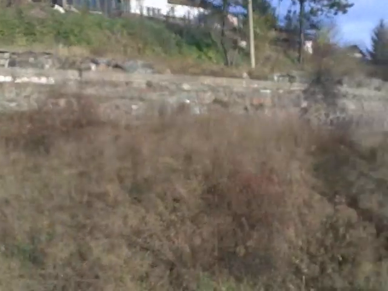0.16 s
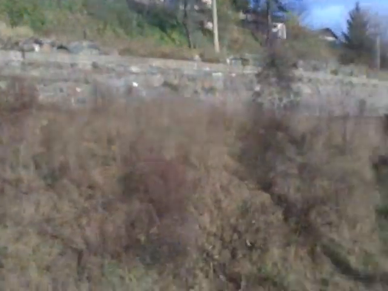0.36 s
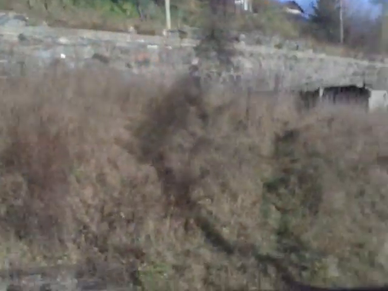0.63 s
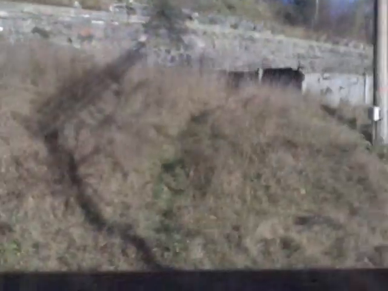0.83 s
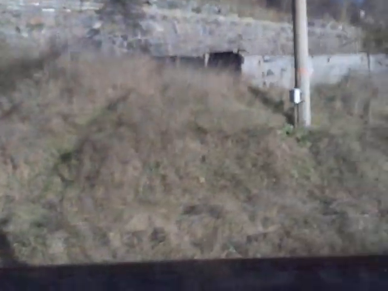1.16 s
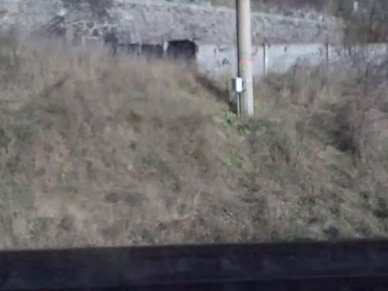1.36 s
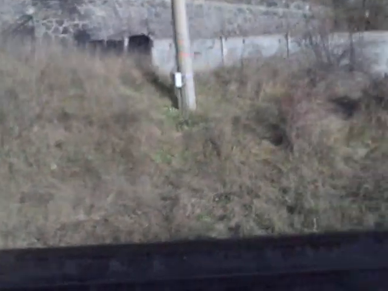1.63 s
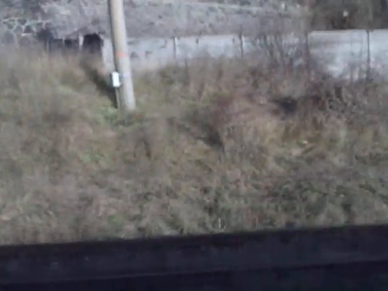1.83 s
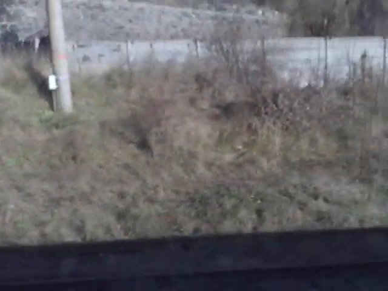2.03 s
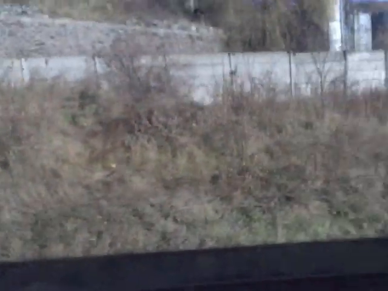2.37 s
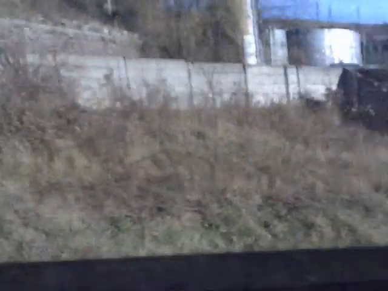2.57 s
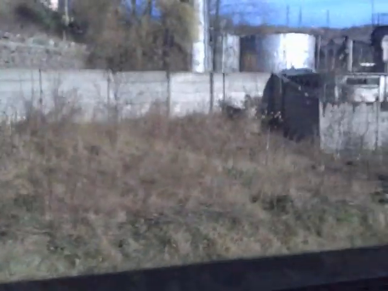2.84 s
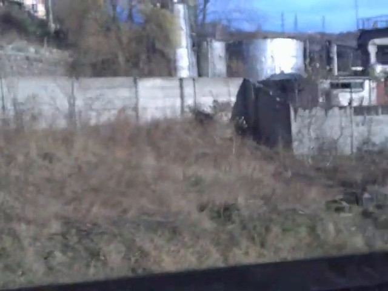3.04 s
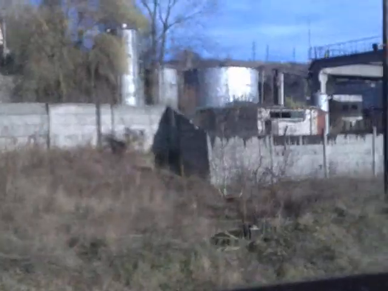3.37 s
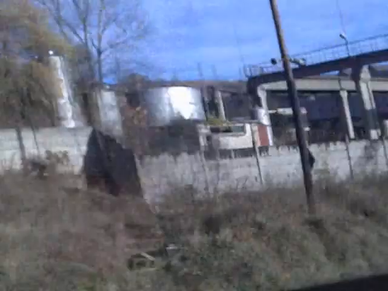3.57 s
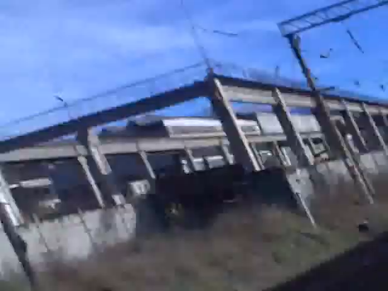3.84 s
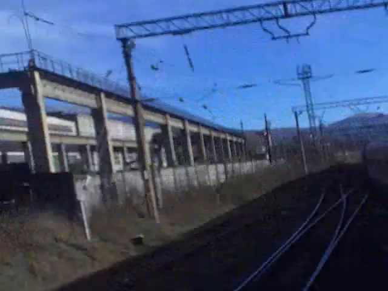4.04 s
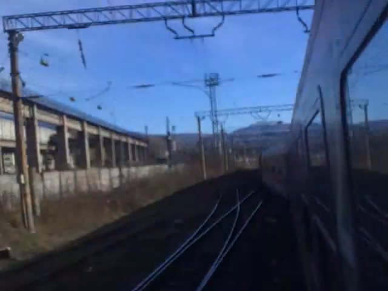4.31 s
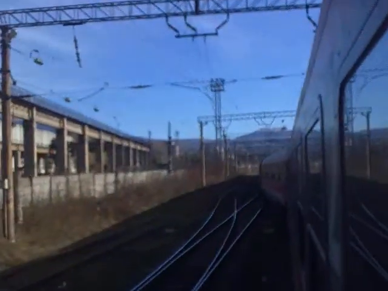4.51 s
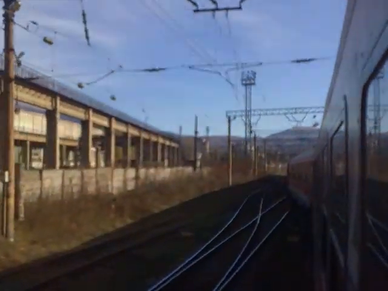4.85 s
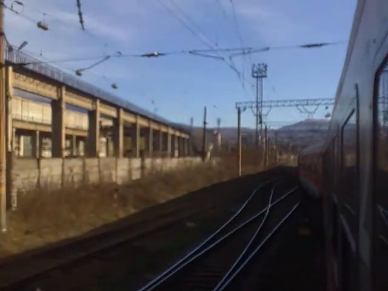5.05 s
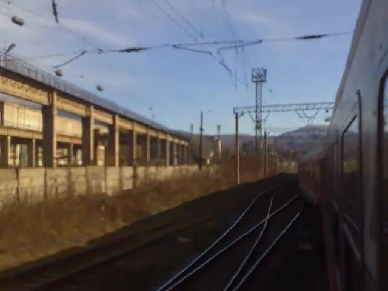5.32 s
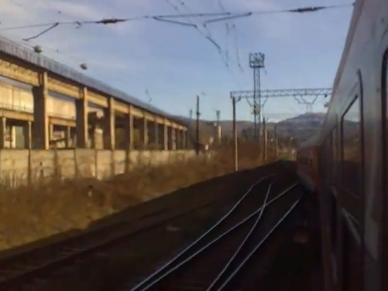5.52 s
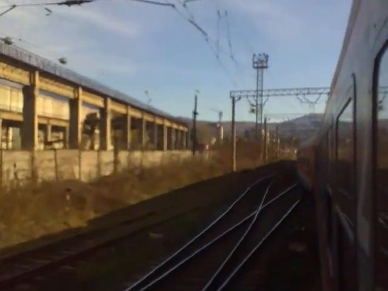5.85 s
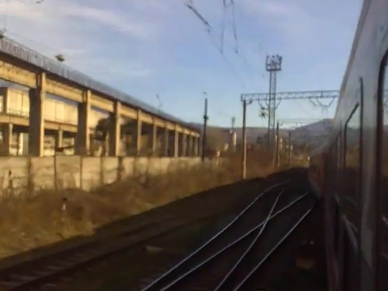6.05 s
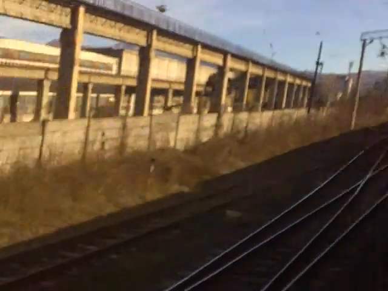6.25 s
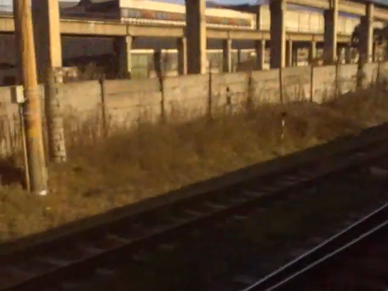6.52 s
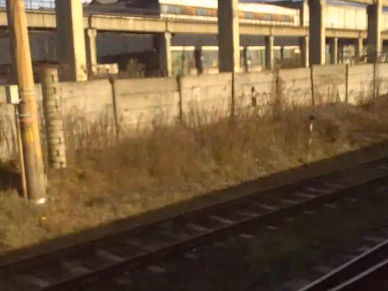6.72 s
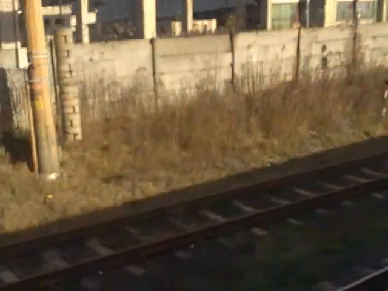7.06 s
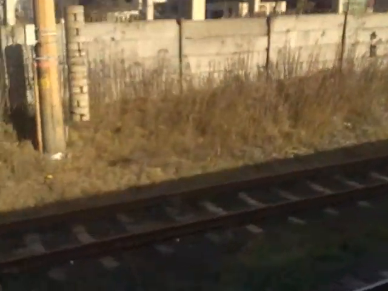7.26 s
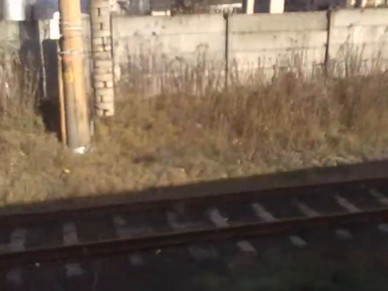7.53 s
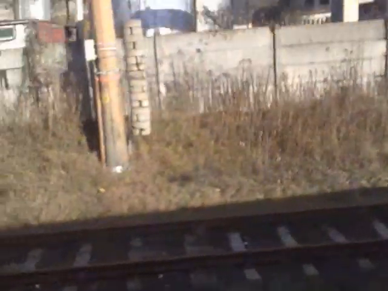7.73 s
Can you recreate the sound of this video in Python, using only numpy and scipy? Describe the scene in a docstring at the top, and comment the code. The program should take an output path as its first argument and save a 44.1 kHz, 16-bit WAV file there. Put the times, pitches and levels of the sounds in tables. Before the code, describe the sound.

A passenger train clanks over rail joints and switches, with dull bumps on the hand-held microphone and brief flange squeals, through a narrow, overloading microphone.

```python
"""A passenger train rolls through station switches, heard at an open window beside a concrete wall.
After a faint start, wheels clang over joints and frogs, each blow a noise burst with echoes and resonances.
In the first half dull, dry bumps, runs of short decaying swings, jostle the hand-held microphone.
Flanges sing briefly as sines; after the middle, blows ring longer and flanges grind in uneven noise.
Rumble and rail rush, shaped noise, run throughout; the narrow-band microphone overloads on big blows."""
import sys
import numpy as np
from scipy import signal
from scipy.fft import rfft, irfft, next_fast_len
from scipy.io import wavfile
from scipy.ndimage import uniform_filter1d, map_coordinates

SR = 44100
rng = np.random.default_rng(int(sys.argv[2]) if len(sys.argv) > 2 else 0)


def to_wav(sig):
    """Store sig (one row per channel, or 1-D mono) as 16-bit WAV at the path in sys.argv[1].

    Samples outside -1..1 are clipped; the rate is SR.
    """
    pcm = np.clip(np.atleast_2d(sig), -1, 1) * 32767
    pcm = np.round(pcm).astype(np.int16)
    wavfile.write(sys.argv[1], SR, pcm.T)  # frames by channels


N = 347949
TIME = np.arange(N) / SR

# resonances of wheel and rail: pitch_hz, width_hz, level_db (resonant() adds 6 dB)
STEEL_MODES = [(910, 36, -7.5), (1074, 33, -10), (1260, 32, -14), (1662, 43, -3.5), (1950, 42, -13.5),
               (2320, 61, -3), (3270, 88, -9)]
# rolling on plain track, then through the switches; rumble follows the shaking of the coach,
# rush the roughness of the rail: time_s, rumble_db, rush_db (both before trim)
ROLLING_LEVELS = [(0.0, -53.5, -54), (0.86, -49.5, -55), (1.54, -26.5, -34), (1.78, -29.5, -44),
                  (2.11, -27, -41), (2.46, -33.5, -34.5), (2.79, -25.5, -35.5), (3.05, -35.5, -41.5),
                  (3.56, -28.5, -35), (3.78, -32, -33.5), (4.04, -43.5, -42.5), (4.64, -40.5, -42.5),
                  (4.83, -38, -34), (5.23, -37, -33.5), (5.62, -44, -41.5), (5.87, -47, -45.5),
                  (6.08, -35, -26.5), (6.2, -38, -22.5), (6.81, -36, -32), (7.01, -30, -27),
                  (7.14, -35.5, -30), (7.89, -42, -37)]


def clangs():
    """Impact excitation: each blow sets off a dense steel clatter and a shorter boom of the body."""
    # wheels striking joints and frogs, the two axles of a bogie about .37 s apart, lighter knocks between:
    # start_s, steel_db, boom_db, contact_s, ring_hz, body_hz
    strikes = [(1.016, -33, -29, .018, 2270, 404), (1.305, -11.5, -16.5, .014, 2510, 323),
               (1.491, -26.5, -20.5, .023, 2280, 510), (1.657, -9, -10.5, .026, 1500, 576),
               (2.319, -4.5, -13, 0.017, 1996, 335), (2.556, -25, -27, .033, 3360, 504),
               (2.689, -14, -32, 0.034, 1971, 340), (3.253, -23.5, -15.5, 0.041, 1050, 627),
               (3.601, -15.5, -25, 0.031, 3280, 494), (4.66, -28.5, -27, 0.024, 1970, 297),
               (4.873, -11.5, -9.5, .045, 1022, 272.5), (4.927, -8, -17, .016, 1900, 276.7),
               (5.253, -6.5, -7.5, .029, 2126, 271), (5.958, -6.5, -9.5, 0.041, 2827, 330),
               (6.339, -13.5, -23, .034, 2474, 592), (6.362, -16, -17.5, 0.037, 2850, 300),
               (6.983, -5.5, -8.5, .042, 2540, 484), (7.369, -5.5, -12, 0.029, 1910, 501)]
    # spectrum of the steel clatter: frequency_hz, density_db (per Hz, relative)
    clatter_spectrum = [(200, -34), (500, -10.5), (900, -6.5), (1350, 0), (1800, 0.5), (2500, 2),
                        (3400, -0.5), (4000, -5.5)]
    # spectrum of the boom: frequency_hz, density_db (per Hz, relative)
    boom_spectrum = [(20, -30.5), (60, -14.5), (130, -6.5), (300, 0), (520, -3), (900, -4), (1400, -15.5),
                     (3000, -48.5)]
    switches_s = 4.4  # the coach enters the switches, where blows ring longer
    joint_t60_s, switch_t60_s = 0.3, 0.46  # after a blow whose boom is heavy_db
    heavy_db, halving_db = -10, 29  # a blow lighter by halving_db rings half as long

    track = np.zeros(N)
    t = np.arange(SR * 3 // 5) / SR
    for start_s, steel_db, boom_db, contact_s, ring_hz, body_hz in strikes:
        t60 = joint_t60_s if start_s < switches_s else switch_t60_s
        t60 *= 2 ** ((boom_db - heavy_db) / halving_db)

        steel_modes = STEEL_MODES + [(ring_hz, 260, -2)]
        steel = noise(clatter_spectrum, steel_modes, patchy_db=3.5, size=len(t))
        steel = steadied(steel, 0.086)
        # the wheel strikes many times within one blow
        rebounds = unit(amp(0.45 * wobble(330, size=len(t))))
        steel_envelope = blow(t, contact_s, t60, attack=0.0042, echo_db=-1)
        add(track, start_s, amp(steel_db) * steel_envelope * rebounds * steel)

        body = noise(boom_spectrum, [(body_hz, 50, 1.5)], patchy_db=-0.4, size=len(t))
        body = steadied(body, 0.041)
        body_envelope = blow(t, contact_s, 0.76 * t60, attack=0.005, echo_db=-5.5)
        add(track, start_s, amp(boom_db) * body_envelope * body)
    return track


def blow(t, contact, t60, attack, echo_db):
    """Reverberant decay: holds while the wheel batters the gap, drops to its echoes, then dies."""
    after = np.maximum(t - contact, 0)
    direct = np.exp(-after / 0.006)
    echoes = amp(echo_db - 60 * after / t60)
    return (1 - np.exp(-t / attack)) * (direct + (1 - direct) * echoes)


def bumps(count=70, size=12):
    """Damped oscillation and friction: runs of quick contacts, each a brief swing and rub."""
    # bumps against the microphone case: time_s, peak_db, pitch_hz, chatter_s (fall to 1/e), rub_db (re peak)
    jolts = [(.945, -17.5, 830, .003, -13.5), (0.9763, -12, 715, 0.026, -15.5),
             (1.1806, -12, 1300, 0.0018, -13), (1.25, -7.5, 277, .003, -21), (1.4485, -4.5, 486, 0.014, -8),
             (1.5124, -9.5, 630, .004, -16), (1.6012, -6, 600, 0.012, -15.5),
             (1.6324, -7.5, 330, .004, -14), (1.8428, -9, 527, 0.0045, -11), (1.913, -6.5, 450, .016, -19),
             (1.969, -2.5, 527, 0.0039, -20.5), (1.988, -3.5, 650, 0.021, -9),
             (2.0287, -1.5, 690, 0.0052, -12), (2.048, -8.5, 533, 0.057, -35),
             (2.127, -13.5, 450, .003, -22), (2.2431, -10, 442, .003, -13), (2.255, -1.5, 426, .007, -15),
             (2.28, -6.5, 650, .014, -14), (2.3007, -1.5, 620, .003, -15.5), (3.236, -5.5, 634, .005, -19),
             (3.259, -8.5, 605, 0.02, -19), (3.47, -2.5, 300, 0.0055, -18.5),
             (3.5758, -8.5, 500, 0.017, -21)]
    # rubbing on the case: frequency_hz, density_db (per Hz, relative)
    rub_spectrum = [(60, -23.5), (160, 1.5), (400, 2), (900, 0), (1250, -8.5), (1700, -17), (3000, -35.5)]
    spacing_s, scatter = 0.007, 0.2  # mean time between contacts of one bump, and its relative spread
    lead_db = -16.5  # a lighter touch comes just before each bump
    jostle_s, jostle_db = (0.98, 4.6), 2.5  # spell of small bumps, and their mean peak over the rumble level

    # many small contacts come with the shaking of the coach
    times, rumble_db, _ = np.transpose(ROLLING_LEVELS)
    contacts = []
    for s in rng.uniform(*jostle_s, count):
        peak_db = np.interp(s, times, rumble_db) + jostle_db + rng.normal(0, 1.7)
        contacts.append((s, amp(peak_db), rng.uniform(320, 720), -15))

    for s, peak_db, hz, chatter_s, rub_db in jolts:
        contacts.append((s - spacing_s, amp(peak_db + lead_db), hz, rub_db))
        contacts.append((s, amp(peak_db), hz, rub_db))
        delays = spacing_s * (np.arange(1, size) + scatter * rng.standard_normal(size - 1))
        pitches = hz * np.exp(0.078 * rng.standard_normal(size - 1))
        for delay, pitch in zip(delays, pitches):
            if delay < 2 * chatter_s:
                gain = amp(peak_db) * np.exp(-(delay / chatter_s) ** 2)
                contacts.append((s + delay, gain, pitch, rub_db))

    swings, rub_power = np.zeros(N), np.zeros(N)
    t = np.arange(-SR // 50, SR // 12) / SR
    for s, gain, hz, rub_db in contacts:
        life = 1.005 / hz  # the swing falls to 1/e in about a cycle
        swing = np.cos(2 * np.pi * (hz * t + rng.random()))
        add(swings, s + t[0], gain * peak(t, 0.75 * life, life) * swing)
        rub = gain * amp(rub_db) * peak(t, 0.0056, 0.0094)
        add(rub_power, s + t[0], rub ** 2)
    rub_noise = steadied(noise(rub_spectrum, [], patchy_db=1.0), 0.02)
    return swings + np.sqrt(rub_power) * rub_noise


def peak(t, rise, fall):
    """Transient envelope: a rounded rise up to t = 0 and an exponential fall."""
    return np.exp(-np.where(t < 0, (t / rise) ** 2, t / fall))


def flanges():
    """Stick-slip friction: a flange grinds in uneven slips, and now and then locks on to one wheel mode."""
    # flanges scraping along the rail: middle_s, level_db (before slips), length_s (see swell)
    scrapes = [(4.642, -29.5, 0.049), (5.865, -26.5, .045), (6.205, -20.5, 0.025), (6.265, -18.5, 0.036),
               (6.51, -27, .02), (6.568, -24, .028), (6.643, -24, 0.043), (6.847, -21.5, 0.059),
               (6.943, -22.5, 0.026)]
    # wheel modes set singing by the flange: middle_s, pitch_hz, peak_db (before slips), length_s (see swell)
    songs = [(1.42, 3305, -31, 0.023), (2.232, 2340, -27.5, .025), (3.09, 1894, -36.5, .035),
             (3.301, 1094, -21, .06), (5.044, 3540, -28, .07), (5.088, 1900, -27.5, .05),
             (5.862, 1073, -24, .038), (5.877, 1690, -26, 0.028), (6.268, 1680, -27, 0.02),
             (6.642, 1236, -28, 0.032), (6.835, 1225, -21.5, .026)]
    # flange grinding: frequency_hz, density_db (per Hz, relative)
    grind_spectrum = [(150, -11), (330, -4), (600, 3.5), (900, -3.5), (1250, -4), (1700, -0.5), (2500, 0),
                      (3400, -3.5), (4000, -10)]

    pressure = sum(amp(db) * swell(s, length) for s, db, length in scrapes)
    slips = unit(amp(2.6 * wobble(170)))
    sound = pressure * noise(grind_spectrum, STEEL_MODES, patchy_db=3.0)
    for s, hz, db, length in songs:
        unsteady_phase = 0.9 * wobble(120) + 0.35 * wobble(450)
        sound += amp(db) * swell(s, length) * np.sin(2 * np.pi * hz * TIME + unsteady_phase)
    return slips * sound


def swell(s, length):
    """Gaussian envelope about time s, falling to 1/e at 0.81 length on either side."""
    return np.exp(-((TIME - s) / (0.81 * length)) ** 2)


def rolling():
    """Roughness excitation: running gear and air rumble in lumps; rough steel on steel rushes above."""
    # running gear and air: frequency_hz, density_db (per Hz, relative)
    rumble_spectrum = [(20, -33), (70, -13), (150, -3.5), (300, 2.5), (500, -1.5), (750, -10.5),
                       (1100, -18), (2000, -43.5), (4000, -69.5)]
    # wheel on rail: frequency_hz, density_db (per Hz, relative)
    rush_spectrum = [(150, -16.5), (500, -10), (1000, -12), (1400, -3), (1800, 4), (2500, 3.5), (3300, 0),
                     (4000, -7)]
    # wheel midrange: frequency_hz, density_db (per Hz, relative)
    midrange_spectrum = [(200, -19), (450, -12), (800, -3.5), (1300, -5), (2000, -8.5), (4000, -33)]
    # the midrange of the wheels comes and goes: time_s, level_db (against the rush)
    midrange_levels = [(0, -7.5), (3.0, -26.5), (3.6, -13.5), (4.2, -6.5), (5.2, -5.5), (6.2, -20),
                       (7.0, -10), (7.89, -10)]
    rumble_trim_db, rush_trim_db = -0.8, 0.4

    s, rumble_db, rush_db = np.transpose(ROLLING_LEVELS)
    lumps_db = 3.2 * wobble(70) + 1.2 * wobble(14)
    rumble_gain = amp(np.interp(TIME, s, rumble_db) + rumble_trim_db + lumps_db)
    rumble = rumble_gain * steadied(noise(rumble_spectrum, [], patchy_db=2.07), 0.13)

    unevenness_db = 1.2 * wobble(110) + 1.1 * wobble(16)
    roughness = amp(np.interp(TIME, s, rush_db) + rush_trim_db + unevenness_db)
    rush = steadied(noise(rush_spectrum, STEEL_MODES, patchy_db=2.5), 0.093)
    midrange_gain = amp(np.interp(TIME, *np.transpose(midrange_levels)))
    midrange = midrange_gain * noise(midrange_spectrum, [], patchy_db=3.0)
    return rumble + roughness * (rush + midrange)


def noise(spectrum, modes, patchy_db, size=N):
    """Filtered random process: coloured, resonant noise of rms 1 with drifting patches of gain."""
    z = signal.stft(rng.standard_normal(size), nperseg=1024)[2]
    field = uniform_filter1d(rng.standard_normal(z.shape), size=4, axis=0)  # smooth over frequency
    field = uniform_filter1d(field, size=8, axis=1)  # and over time
    patchy = signal.istft(z * amp(patchy_db * unit(field)), nperseg=1024)[1][:size]
    return unit(filtered(patchy, lambda hz: shape(spectrum, hz) * resonant(modes, hz)))


def steadied(x, seconds):
    """Short-term power normalisation: chance swells of noise evened out over the given time."""
    power = uniform_filter1d(x ** 2, max(int(seconds * SR), 1))
    return x / np.sqrt(np.abs(power) + 1e-9)


def wobble(rate, size=N):
    """Band-limited random modulation: a smooth curve through rate knots a second."""
    knots = rng.standard_normal(int(size * rate / SR) + 4)
    return map_coordinates(knots, [np.arange(size) * rate / SR])


def shape(points, hz):
    """Spectral envelope: gain of (frequency_hz, level_db) points joined on a log axis."""
    f, db = np.transpose(points)
    return amp(np.interp(np.log(hz + 1), np.log(f), db))


def resonant(modes, hz):
    """Modal resonance: power peaks of each mode, raised 6 dB, standing on a flat response."""
    power = 1
    for f, width, db in modes:
        power = power + amp(db) ** 2 * 4 / (1 + (2 * (hz - f) / width) ** 2)
    return np.sqrt(power)


def filtered(x, response):
    """Linear filtering: the spectrum of x times a response of frequency."""
    m = next_fast_len(len(x) + SR // 10)
    return irfft(rfft(x, m) * response(np.fft.rfftfreq(m, 1 / SR)), m)[:len(x)]


def add(track, s, sound):
    """Superposition: mix a sound into the track from time s."""
    room = track[round(s * SR):][:len(sound)]
    room += sound[:len(room)]


def amp(db):
    """Logarithmic level: decibels to gain."""
    return 10 ** (np.asarray(db) / 20)


def unit(x):
    """Power normalisation: scaled to rms 1."""
    return x / np.sqrt(np.mean(x ** 2) + 1e-20)


def scene():
    """Superposition of all sources at the window."""
    return (clangs() + bumps() + flanges() + rolling())[None]


def record(dry):
    """Nonlinear distortion: a telephone-band microphone, hard overload that spits treble, a band limit."""
    # microphone response: frequency_hz, level_db
    microphone_response = [(3400, 1), (3650, -1.5), (4000, -10), (4350, -19.5), (4600, -48.5),
                           (5200, -87.5)]
    ceiling, top_hz = 0.72, 15900
    narrow = filtered(dry[0], lambda hz: shape(microphone_response, hz))
    overloaded = np.clip(narrow, -ceiling, ceiling)
    return filtered(overloaded, lambda hz: hz < top_hz)[None]


dry = scene()
out = record(dry)
to_wav(out)
```